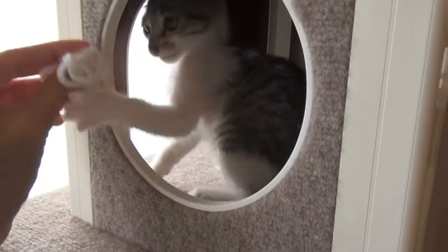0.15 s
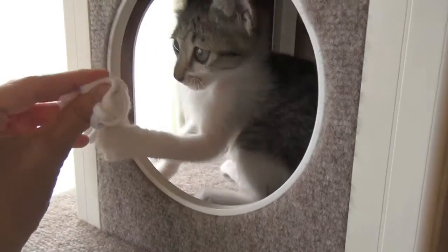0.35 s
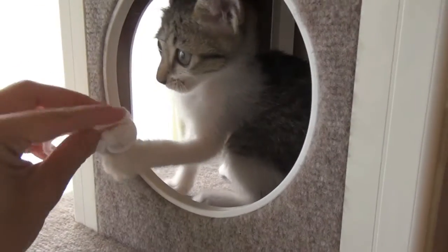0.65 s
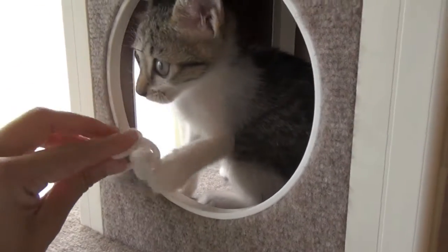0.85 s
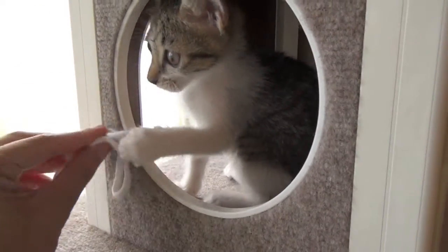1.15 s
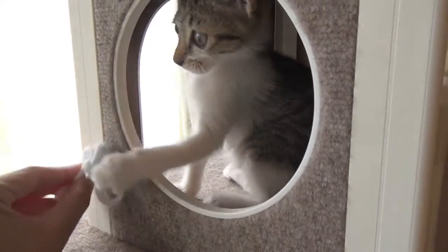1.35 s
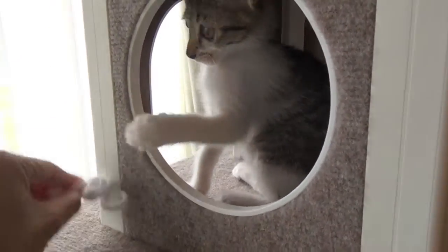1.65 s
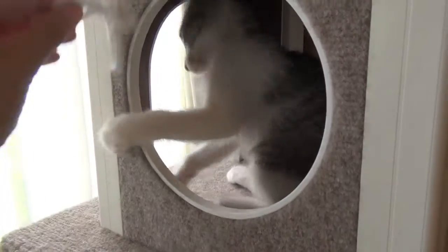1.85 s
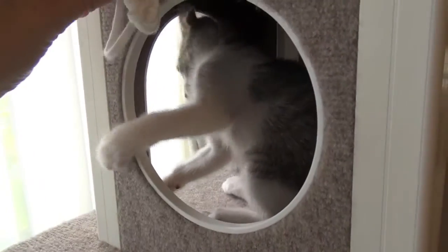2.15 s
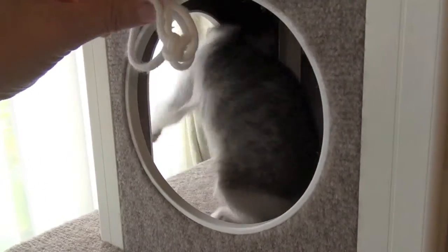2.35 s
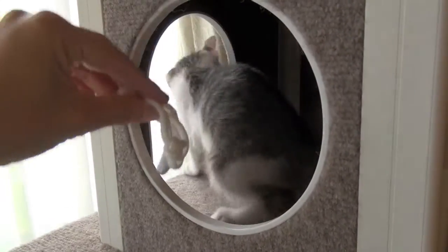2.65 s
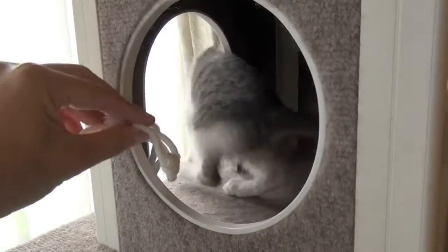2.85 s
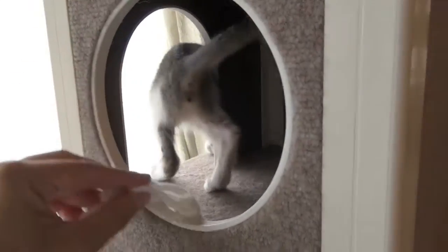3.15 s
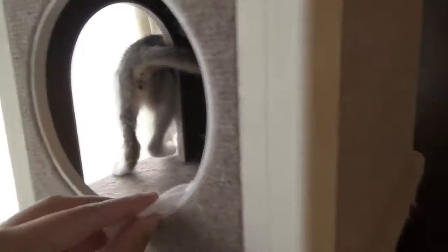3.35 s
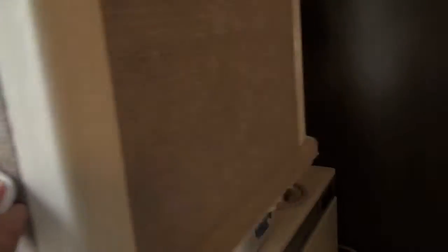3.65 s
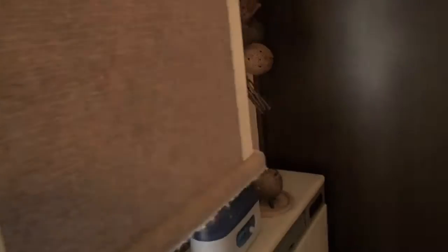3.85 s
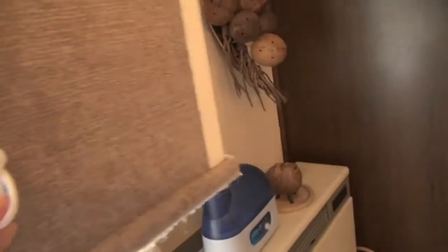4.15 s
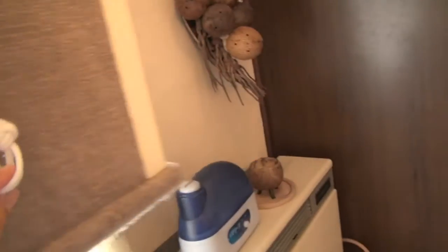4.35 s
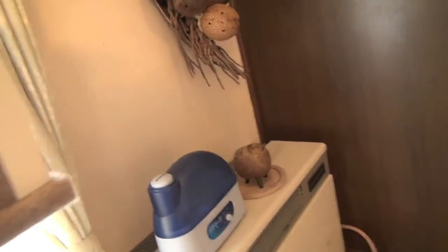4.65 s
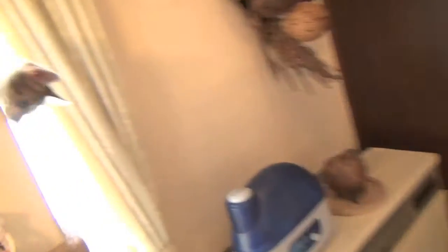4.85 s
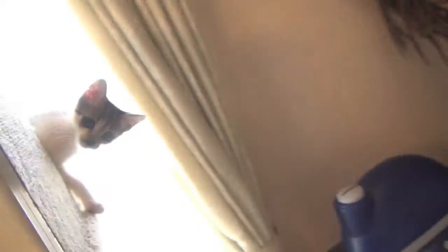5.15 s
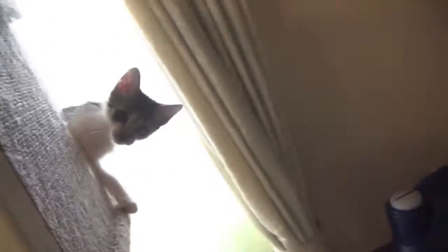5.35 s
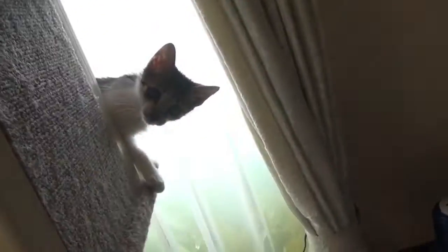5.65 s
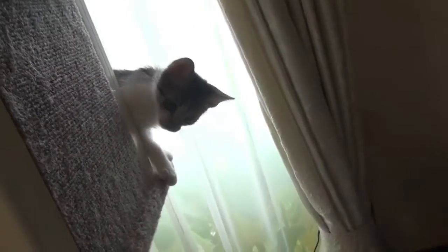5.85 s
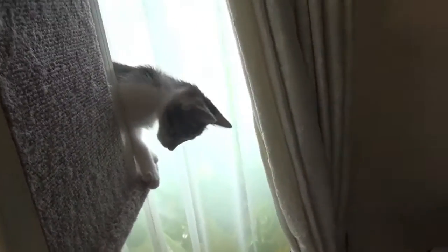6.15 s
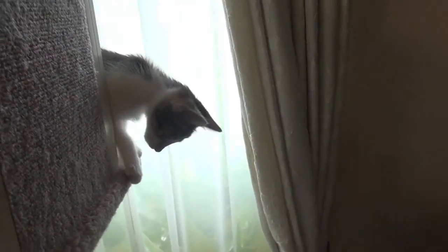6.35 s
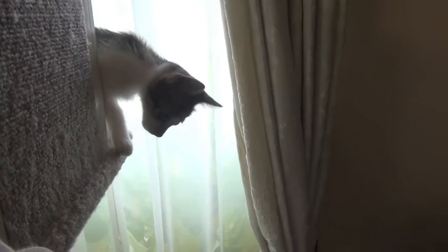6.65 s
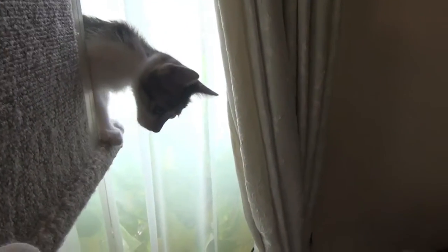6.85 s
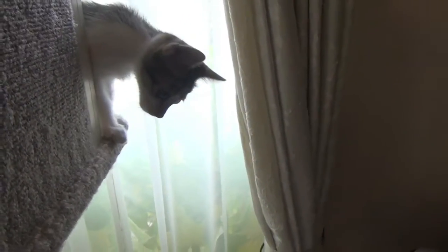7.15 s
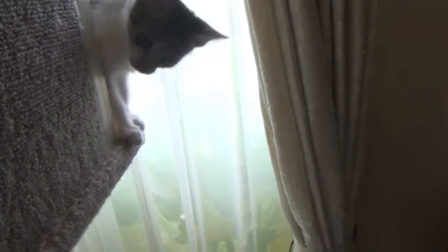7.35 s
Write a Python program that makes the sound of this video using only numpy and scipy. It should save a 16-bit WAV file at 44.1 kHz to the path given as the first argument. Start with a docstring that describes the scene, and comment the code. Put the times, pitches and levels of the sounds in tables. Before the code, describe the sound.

A quiet furnished room with faint hiss and low appliance hum, recorded close with a hand-held stereo microphone. At once a kitten's paw knocks on a carpeted wooden tower with a short, hollow thud. From 0.15 to 2.2 s it bats at a cord: soft, grainy rustles of fur and fibre with light, dull taps. Around 2.3 s claws pluck the carpet in quick ticks, then at 2.5 s comes the loudest event, a heavy boomy thump with a woody crack and small bounces. A crisp tap follows at 2.8 s, lighter ones at 3.0 s. Scratchy rubbing swells between 3.3 and 4.1 s, with ticks and muffled bumps near 4 s. After a lull, rustles and small knocks return from 4.6 to 5.8 s, softer and duller, then fade by 6.8 s. From about 6 s a faint distant vehicle hums, its pitch sinking near 6.8 s, leaving mostly quiet room tone.

```python
"""First a kitten's paw knocks and lands on a carpeted tower, close to a hand-held camera's microphone.
It bats at a cord and turns round in the cubby: struck boards ring as dying sines, the hollow cubby booms,
and fur, claws and cord rustle on the carpet as grainy bands of noise.
Behind lie the hiss and hum of a quiet room, soft low swells and, far outside, a vehicle slowing down."""
import sys
import numpy as np
from scipy import signal
from scipy.io import wavfile
from scipy.ndimage import uniform_filter1d

SR = 44100
rng = np.random.default_rng(int(sys.argv[2]) if len(sys.argv) > 2 else 0)


def output_pcm(signal):
    """Save a mono or channel-first signal as 16-bit PCM at the path in sys.argv[1].

    Samples are clipped to [-1, 1] before scaling.
    """
    pcm = np.clip(np.atleast_2d(signal).T, -1, 1) * 32767
    wavfile.write(sys.argv[1], SR, np.round(pcm).astype(np.int16))


N = 330750


def gain_of(db):
    """Decibels to an amplitude factor."""
    return 10 ** (np.asarray(db) / 20)


def evened(x):
    """Scales to rms 1."""
    return x / np.sqrt(np.mean(x ** 2) + 1e-20)


def peaked(x):
    """Scales to peak 1."""
    return x / abs(x).max()


def read(points, hz):
    """Reads a table on a log-frequency axis."""
    f, value = np.transpose(points)
    return np.interp(np.log(hz + 1), np.log(f + 1), value)


def add(mix, start_s, sound):
    """Mixes a sound in at its start time, cut at the end of the mix."""
    part = mix[:, round(start_s * SR):][:, :sound.shape[1]]
    part += sound[:, :part.shape[1]]


def panned(x, db):
    """One source heard a little louder on one side; positive leans left."""
    return np.array([x * gain_of(db / 2), x * gain_of(-db / 2)])


def narrow(hz, width_hz):
    """Noise squeezed by a one-pole resonance into a narrow band: a wavering tone."""
    pole = np.exp(-np.pi * width_hz / SR)
    noise = rng.standard_normal(N) + 1j * rng.standard_normal(N)
    slow = signal.lfilter([1], [1, -2 * pole, pole * pole], noise)
    return evened((slow * np.exp(2j * np.pi * hz * np.arange(N) / SR)).real)


# how alike left and right hear the direct noise: (frequency [Hz], likeness [0-1])
LEFT_RIGHT_LIKENESS = [(30, 1), (250, 0.99), (450, 0.91), (800, 0.72), (2400, 0.59), (5000, 0.79),
                       (8000, 0.78), (11000, 0.75)]


def pair(shape, patchy_db, size):
    """Two partly alike channels of noise with a given spectrum and drifting patches."""
    frames, hz = 4 * N // size + 5, np.fft.rfftfreq(size, 1 / SR)
    a, b, c, d, patches = rng.standard_normal((frames, len(hz), 5)).T
    patches = uniform_filter1d(patches, size=size // 64, axis=0)  # smooth over frequency
    patches = evened(uniform_filter1d(patches, size=10, axis=1))  # then over time
    same = read(LEFT_RIGHT_LIKENESS, hz)[:, None]
    left = a + 1j * b
    right = same * left + np.sqrt(1 - same ** 2) * (c + 1j * d)
    spectra = np.array([left, right]) * gain_of(read(shape, hz)[:, None] + patchy_db * patches)
    return evened(signal.istft(spectra, nperseg=size, noverlap=3 * size // 4)[1][:, :N])


# spectrum of room and microphone hiss: (frequency [Hz], relative level [dB])
AIR_SPECTRUM = [(12, -57), (20, -1.5), (48, -15.5), (187, -11.5), (222, -5), (310, -17), (357, -5.5),
                (399, -13), (499, -18), (1060, -20), (1290, -35), (1400, -20.5), (2600, -28), (4060, -27.5),
                (16000, -35.5)]


def air():
    """Room air and microphone hiss: nearly even noise with a low-heavy spectrum."""
    return gain_of(-58) * pair(AIR_SPECTRUM, patchy_db=0.3, size=2048)


# appliances: (frequency [Hz], level before the move [dB], waver width [Hz], steady share [0-1],
# level change behind the tower [dB])
APPLIANCE_TONES = [(28.6, -83, 3, .6, 2), (59, -78, 2.7, 0.5, 12), (116.5, -71, 4.1, 0.3, -1.5),
                   (228.4, -68, 3.7, 0.52, 0), (1108, -75, 105, 0.03, 5)]


def hum():
    """Motors elsewhere in the house: faint tones, partly wavering; levels shift as the camera moves."""
    t, out = np.arange(N) / SR, np.zeros(N)
    behind = np.clip(t - 4.0, 0, 1)  # the move takes 4 s to 5 s
    for hz, db, waver_hz, steady_share, change_db in APPLIANCE_TONES:
        steady = np.sqrt(2 * steady_share) * np.sin(2 * np.pi * (hz * t + rng.random()))
        wavering = np.sqrt(1 - steady_share) * narrow(hz, waver_hz)
        out += gain_of(db + change_db * behind) * (steady + wavering)
    return out


# far vehicle: (time [s], firing rate [Hz], level before the orders [dB])
VEHICLE_SPEED = [(5.7, 74, -73), (6.101, 74.64, -60), (6.55, 75.73, -59.5), (6.68, 73.14, -57.5),
                 (6.8, 64.6, -61.5), (7.0, 54.8, -53.5), (7.15, 53.8, -56), (7.5, 53.6, -56.5)]
# its harmonics: (multiple of the firing rate, relative level [dB])
FIRING_ORDERS = [(1, -5), (2, -8), (3, -11), (4, -15.5)]


def engine():
    """Low firing orders far outside glide with the engine speed; each flutters in level."""
    s, hz, db = np.transpose(VEHICLE_SPEED)
    t = np.arange(N) / SR
    firings = np.cumsum(np.interp(t, s, hz)) / SR
    orders = np.zeros(N)
    for multiple, order_db in FIRING_ORDERS:
        flutter = gain_of(order_db + 4.0 + 2.0 * narrow(0, 4.0))
        orders += flutter * np.cos(2 * np.pi * multiple * firings)
    return gain_of(np.interp(t, s, db, left=-100)) * orders


# low notes, most after a step: (start [s], length [s], frequency [Hz], level [dB])
LOW_SWELLS = [(2.585, 0.099, 160, -45), (2.793, 0.17, 103, -59), (3.0, 0.92, 57, -64.5),
              (4.05, 0.5, 59.6, -66), (4.3, 1, 185.5, -63), (4.895, 0.38, 55.3, -62.5),
              (5.468, 0.139, 142, -52.5), (5.497, 0.56, 361.3, -66.5), (7.102, 0.45, 227, -64.5),
              (7.218, 0.93, 359, -62)]


def swells():
    """Soft low notes that rise, waver and fade: a sine mixed with narrow noise."""
    t, out = np.arange(N) / SR, np.zeros(N)
    for start, length, hz, db in LOW_SWELLS:
        shape = np.sin(np.pi * np.clip((t - start) / length, 0, 1)) ** 0.29
        steady = np.sqrt(2) * np.sin(2 * np.pi * hz * t + 2 * np.pi * rng.random())
        out += gain_of(db) * shape * (0.96 * steady + 0.67 * narrow(hz, 12.0))
    return out


# how long the room rings: (frequency [Hz], t60 [s])
ROOM_DECAY = [(100, 0.39), (300, 0.21), (1000, 0.23), (4000, 0.17), (12000, 0.06)]
# echoes come from all round: (frequency [Hz], left-right likeness [0-1])
ECHO_LIKENESS = [(60, 1), (200, 1), (400, 0.77), (800, 0.66), (3000, 0.55), (10000, 0.79)]


def room(x):
    """The room's echo: sparse taps of random sign, each band dying at its own speed."""
    taps = np.zeros((2, SR // 2))
    slots = np.arange(200, SR // 2 - 20, 20)  # one tap in every 20 samples
    at = slots + rng.integers(0, 20, (2, len(slots)))
    np.put_along_axis(taps, at, rng.choice([-1., 1.], at.shape), 1)
    hz, t, z = signal.stft(taps, SR, nperseg=512)
    same = read(ECHO_LIKENESS, hz)[:, None]
    z[1] = same * z[0] + np.sqrt(1 - same ** 2) * z[1]
    decay = gain_of(-60 * t / read(ROOM_DECAY, hz)[:, None])
    tail = signal.istft(z * decay, SR, nperseg=512)[1]
    return signal.fftconvolve(x[None], tail / np.linalg.norm(tail[0]), axes=1)[:, :N]


# strokes on the carpet, before grain: (start [s], length [s], scuff level [dB],
# fibre hiss over the scuff [dB], weight over the scuff, before the boards [dB])
CARPET_STROKES = [(0.154, .28, -53, -1.5, -1.5), (0.258, 0.11, -58.5, -3, 6.5),
                  (0.534, 0.39, -59.5, 1, -3.5), (0.829, 0.27, -55, -0.5, -7.5),
                  (1.067, 0.22, -57.5, -1.5, -3), (1.235, 0.47, -56, 1, -9), (1.614, .16, -53.5, -3.5, -10),
                  (1.786, 0.092, -63, -1, 3), (1.89, 0.19, -62, -2, 1), (2.062, 0.16, -61, -6, 7.5),
                  (2.195, 0.28, -56, -2.5, 2), (2.486, 0.14, -53, -3.5, 12.5), (2.606, 0.089, -55, -11, 8),
                  (2.79, 0.1, -58.5, -2.5, -4), (2.852, 0.16, -58.5, -2, -3), (2.972, 0.25, -57, -4.5, -2),
                  (3.235, 0.21, -59, 2.5, 2), (3.358, 0.26, -50.5, -0.5, -3), (3.52, 0.24, -51, -1, 1),
                  (3.706, 0.31, -49.5, 1, 4), (3.884, 0.25, -46.5, -7, 3.5), (4.095, 0.29, -64.5, -7, 4),
                  (4.286, 0.29, -60, -12, 13.5), (4.6, 0.17, -57.5, -9, 4), (4.741, 0.38, -52.5, -5, 3.5),
                  (4.967, 0.28, -52, -1, -3), (5.204, 0.18, -54, -8, 1), (5.37, 0.19, -50.5, -7.5, -2),
                  (5.494, 0.35, -59.5, -1.5, 4.5), (5.736, 0.26, -57.5, -8.5, -1),
                  (5.917, 0.24, -59, -3.5, 4.5), (6.201, 0.16, -54.5, -9, -5), (6.323, 0.13, -56, -16, -1),
                  (6.51, 0.17, -58, -7, -2), (6.63, .24, -63.5, -5.5, 0), (6.793, 0.14, -67, -18, 1),
                  (7.099, .2, -74, -13, 16)]
# fur brushing between strokes: (hiss [dB], scuff [dB], fine top [dB], boom before the boards [dB])
RESTING_LEVELS = (-73, -64.5, -69.5, -67.5)
# the top octave against the hiss of the strokes: (time [s], level [dB])
FINE_TOP_LEVEL = [(0, -3), (1.2, -1.5), (2.2, 3), (2.7, 5), (2.8, -18), (3.15, -8), (3.3, 4.5), (3.65, -2),
                  (3.85, -11), (4.9, -14), (7.5, -16)]
STROKE_PEAK, STROKE_POINT = 0.49, 1.23  # where a stroke peaks (share of its length), how pointed it is
BOOM_LAG_S = 0.024  # the weight follows the touch of the fur


def strokes(t):
    """Every stroke swells and fades alike; gives the strength of hiss, scuff, fine top and boom."""
    start, length, scuff_db, hiss_db, boom_db = np.transpose(CARPET_STROKES)[:, :, None]
    progress = np.clip((t - start) / length, 0, 1) ** (np.log(.5) / np.log(STROKE_PEAK))
    power = abs(np.sin(np.pi * progress)) ** (2 * STROKE_POINT) * gain_of(2 * scuff_db)
    hiss = (power * gain_of(2 * hiss_db)).sum(0)
    boom = np.interp(t - BOOM_LAG_S, t, (power * gain_of(2 * boom_db)).sum(0))
    top = hiss * gain_of(2 * np.interp(t, *np.transpose(FINE_TOP_LEVEL)))
    resting_power = gain_of(RESTING_LEVELS)[:, None] ** 2
    return np.sqrt(np.array([hiss, power.sum(0), top, boom]) + resting_power)


# spectra of fibre hiss, scuff, fine top and boom: (frequency [Hz], relative level [dB])
FIBRE_SPECTRUM = [(2500, -38), (3600, -3.5), (4600, 1), (5700, 3.5), (6700, 1), (8000, -6.5), (9500, -39),
                  (12000, -35)]
SCUFF_SPECTRUM = [(400, -23.5), (650, -3), (850, -7), (1120, -3), (1500, -5.5), (2300, -8.5), (3200, -10.5),
                  (4500, -23)]
TOP_SPECTRUM = [(7000, -16), (8800, -8), (10200, -5), (12000, -1.5), (13700, -5.5), (15000, -38),
                (16000, -1)]
BOOM_SPECTRUM = [(90, -79), (150, 4), (220, -9), (300, -10), (400, 1), (520, 2.5), (750, -42)]
# the cubby's note against the boom, less behind the tower: (time [s], level [dB])
CUBBY_LEAD = [(0, 9.5), (3.6, 1.5), (4.1, -4.5), (7.5, -6.5)]
CUBBY_HZ, CUBBY_WIDTH_HZ = 285, 24
BOOM_COUPLING_DB = -7.5  # how much of the weight of a stroke reaches the boards


def rubbing():
    """Fibres slip in clumps: one grainy gate shakes hiss, top and scuff; the cubby's air answers."""
    t, coarse = np.arange(N) / SR, np.arange(0, N + 200, 200) / SR
    hiss, scuff, top, low = (np.interp(t, coarse, strength) for strength in strokes(coarse))
    slips = rng.random(N) < 220 / SR  # about 220 slips a second
    slips = slips * gain_of(6.4 * np.minimum(rng.exponential(1, N), 3))
    slip_decay = np.exp(-np.arange(2000) / SR / 0.0082)
    grain = evened(0.38 + evened(signal.oaconvolve(slips, slip_decay)[:N]))
    cubby_note = gain_of(np.interp(t, *np.transpose(CUBBY_LEAD))) * narrow(CUBBY_HZ, CUBBY_WIDTH_HZ)
    boom = pair(BOOM_SPECTRUM, patchy_db=3.5, size=1024) + cubby_note
    fibres = hiss * pair(FIBRE_SPECTRUM, patchy_db=2.0, size=256) * grain ** 0.38
    fibres += top * pair(TOP_SPECTRUM, patchy_db=2.5, size=256) * grain ** 0.19
    fibres += scuff * pair(SCUFF_SPECTRUM, patchy_db=2.0, size=512) * grain ** 0.45
    return fibres * panned(np.ones(1), 1) + low * gain_of(BOOM_COUPLING_DB) * boom


# claws plucking loops of carpet: (time [s], peak level [dB], frequency [Hz], t60 [s])
CARPET_PLUCKS = [(2.2858, -39, 1470, .02), (2.318, -39, 1430, .022), (2.333, -36, 1370, 0.015),
                 (2.338, -36, 1300, 0.012), (2.3487, -35.5, 1420, 0.016), (2.476, -29, 1150, 0.011),
                 (3.432, -38, 1270, 0.015), (3.582, -43.5, 2250, .015), (5.279, -38, 1110, 0.022)]


def plucks(mix):
    """A loop of yarn snaps back from a claw: one short, dying note each."""
    t = np.arange(2000) / SR
    for s, db, hz, t60 in CARPET_PLUCKS:
        envelope = (1 - np.exp(-t / 0.00077)) * gain_of(-60 * t / t60)
        note = peaked(np.sin(2 * np.pi * hz * t) * envelope)
        add(mix, s, gain_of(db) * note * np.ones((2, 1)))


def ring(modes, t, lean_db):
    """Dying sines of a struck body; lean_db favours the modes that the blow reaches best."""
    hz, db, t60 = np.transpose(modes)[:, :, None]
    return (gain_of(db + lean_db - 60 * t / t60) * np.sin(2 * np.pi * hz * t)).sum(0)


# deep modes of the boards: (frequency [Hz], relative level [dB], t60 [s])
BOARD_MODES = [(100.4, -20, 0.3), (153, 3.5, 0.087), (202.3, -6, 0.24), (216.3, -4, 0.21), (279, -7, 0.19),
               (369, -14, 0.19)]


def blow(t, board_db, note_db, note_hz, note_t60):
    """The soft weight of a paw drives the boards and one hollow note."""
    swell = 1 - np.exp(-t / 0.0047)  # the pad of the paw flattens first
    note = peaked(swell * gain_of(-60 * t / note_t60) * np.sin(2 * np.pi * note_hz * t))
    sides_db = 0.46 * rng.uniform(-1.1, 1, (len(BOARD_MODES), 1))  # each mode beams its own way
    both_sides = np.array([ring(BOARD_MODES, t, sides_db), ring(BOARD_MODES, t, -sides_db)])
    return gain_of(board_db) * peaked(swell * both_sides) + gain_of(note_db) * panned(note, 0.77)


# heavy landings and the bounces of the tower on the floor: (time [s], board level [dB],
# thud level [dB], thud pitch [Hz], thud t60 [s])
LANDINGS = [(0.0417, -25.5, -23.5, 226, 0.092), (2.476, -45, -41, 390, .047),
            (2.482, -36, -31.5, 393, 0.056), (2.501, -14.5, -4.5, 215, 0.052),
            (2.509, -45, -4.5, 234, 0.031), (2.532, -48, -38, 243, 0.076), (2.554, -49, -30, 220, .052),
            (2.578, -35, -27.5, 237, 0.035), (2.597, -39, -42, 231, 0.066), (2.646, -37.5, -42, 251, 0.12),
            (3.951, -39.5, -41, 336, 0.097), (4.013, -36, -37, 433, 0.086), (5.279, -45.5, -55, 268, .08),
            (5.4286, -40.5, -31.5, 316, 0.058), (5.784, -43, -42, 364, .06), (5.808, -49, -54, 390, .05)]


def thuds(mix):
    """Landing weight and the tower's bounces: deep board modes under one dying thud note."""
    for s, *row in LANDINGS:
        add(mix, s, blow(np.arange(SR // 4) / SR, *row))


# bright modes of the frame: (frequency [Hz], relative level [dB], t60 [s])
FRAME_MODES = [(456, 9, .05), (576, 8.5, 0.038), (692, 3, 0.034), (823, -8, 0.042), (969, -4.5, 0.056),
               (1068, 4, 0.026), (1209, 1.5, 0.018), (1396, -5.5, 0.039), (1584, -0.5, 0.026),
               (1890, 1, 0.014), (2170, -3, .018), (2400, -1, 0.028), (3040, -25, 0.0116),
               (3560, -20, 0.013), (4300, -4, 0.012)]
# the cubby's note shifts as the kitten does: (time [s], frequency [Hz], t60 [s])
HOLLOW_NOTE = [(0, 290, 0.31), (2.4, 285.7, 0.14), (3.5, 268, 0.093), (4.6, 296, .07)]
BOARD_UNDER_DB = -12  # boards under the hollow note
CLAW = signal.butter(3, [2300, 6800], "band", fs=SR, output="sos")  # the bright band of a claw tip
CLAW_EDGE = signal.butter(3, 8000, "high", fs=SR, output="sos")  # the finest edge of the tick


def knock(s, crack_db, colour_hz, scuff_ms, tick_db, weight_db):
    """A sharp touch and a short scuff shake the frame; the weight behind it sounds the cubby."""
    t = np.arange(SR // 4) / SR
    u = t * 1000 / scuff_ms
    shared, own = rng.standard_normal(len(t)), rng.standard_normal((2, len(t)))
    scuff = (shared + 0.11 * own) * np.exp(-u) * (1 - np.exp(-u / 0.34))  # long scuffs start gently
    scuff[:, 0] = 2.2 / max(scuff_ms, 1)  # short ones start with a sharp contact
    octaves_off = np.log2(np.array(FRAME_MODES)[:, :1] / colour_hz)
    frame = ring(FRAME_MODES, t, -11.0 * octaves_off ** 2)
    crack = peaked(signal.fftconvolve(scuff, frame[None], axes=1)[:, :len(t)])
    tick = peaked(signal.sosfilt(CLAW, scuff))
    tick += gain_of(-19.5) * peaked(signal.sosfilt(CLAW_EDGE, scuff))
    when, hz, t60 = np.transpose(HOLLOW_NOTE)
    note_hz, note_t60 = np.interp(s, when, hz), np.interp(s, when, t60)
    body = blow(t, weight_db + BOARD_UNDER_DB, weight_db, note_hz, note_t60)
    touch = gain_of(crack_db) * crack + gain_of(tick_db) * tick
    return body + touch * panned(np.ones(1), 0.6)  # paws lean left


# sharp contacts of paw and claw: (time [s], crack level [dB], crack colour [Hz], scuff length [ms],
# claw tick level [dB], weight level [dB])
PAW_KNOCKS = [(.036, -23.5, 980, 1.77, -29, -33), (.0415, -26, 840, 3.6, -64, -50),
              (.168, -35.5, 1083, 2.5, -43, -53), (.246, -44, 1140, 7.5, -50, -66),
              (.490, -49, 1190, 3.7, -51, -57), (.984, -49, 600, 7.3, -52, -49),
              (1.1432, -41.5, 1140, 3.1, -49, -49.5), (1.344, -43.5, 1110, 20, -44.5, -67),
              (1.521, -45, 1310, 2.6, -44, -68), (1.7, -43, 1210, 15, -45, -47),
              (1.817, -62, 1490, 2.3, -45, -61), (1.828, -58, 600, 3.3, -51, -42.5),
              (1.989, -42, 680, 2.5, -57, -50.5), (2.259, -43.5, 1800, 13, -43, -57),
              (2.282, -32.5, 2000, 3.7, -33.5, -60), (2.287, -29, 1300, 1.9, -61, -34),
              (2.319, -39, 1460, 2.4, -41, -40.5), (2.331, -41, 1450, 2, -38, -58),
              (2.341, -37, 1310, 1.3, -47, -49), (2.349, -41, 1390, 1, -41, -50),
              (2.421, -46, 1500, 1, -43, -62), (2.476, -19, 1030, 3.5, -63, -50),
              (2.482, -22, 600, 1.3, -57, -50), (2.501, -16, 695, 3.4, -30.5, -40),
              (2.507, -18.5, 517, 6.3, -53.5, -35), (2.532, -38, 895, 16, -45, -50),
              (2.578, -39, 600, 8.2, -54, -50), (2.646, -44, 1200, 12, -44, -50),
              (2.8045, -23, 1110, 1.01, -22.5, -35.5), (2.883, -40.5, 1510, 4.4, -63, -65),
              (3.0325, -36, 2170, 1.6, -35.5, -47), (3.061, -41.5, 910, 6.1, -70, -52),
              (3.323, -47.5, 2600, 33, -47, -62), (3.354, -37.5, 1500, 5.2, -41.5, -42),
              (3.376, -47, 2640, 29, -46, -57), (3.415, -38, 1800, 1.2, -36, -59),
              (3.432, -39, 1300, 1.5, -48, -45), (3.494, -39, 1200, 6.8, -44, -42.5),
              (3.581, -40.5, 1600, 4.2, -45, -62), (3.762, -58, 2500, .83, -42, -54),
              (3.787, -37.5, 1200, 1.9, -38, -45.5), (3.862, -37, 1510, 2.7, -35, -48),
              (3.95, -36.5, 960, 13, -37.5, -54), (4.013, -34.5, 805, 15, -37, -54),
              (4.652, -40.5, 1690, 1.9, -51, -59), (4.896, -41.5, 900, 11, -41, -62),
              (5.240, -42, 990, 10, -60, -56), (5.264, -37, 1110, 12, -44, -66),
              (5.279, -40, 1100, 18, -57, -59), (5.415, -42, 1530, 21, -39, -52),
              (5.577, -42.5, 990, 13, -51, -54.5), (5.784, -33.5, 1160, 16, -70, -55),
              (5.786, -44, 2900, 3.8, -61, -62), (5.807, -39, 1100, 28, -66, -58),
              (6.189, -44, 990, 1.7, -61, -55), (6.24, -53, 3920, 15, -49, -66),
              (6.268, -45, 2600, 27, -46, -65), (6.36, -45.5, 2600, 19, -50.5, -64),
              (6.591, -43.5, 687, 2.5, -60, -66)]


def knocks(mix):
    """Paws and claws strike the tower: each contact cracks, ticks and sounds the hollow cubby."""
    for row in PAW_KNOCKS:
        add(mix, row[0], knock(*row))


def scene():
    """The quiet house, rubbing, then plucks, thuds and knocks with their echo."""
    paws = np.zeros((2, N))
    plucks(paws)
    thuds(paws)
    knocks(paws)
    house = air() + hum() + engine() + swells()
    echo = gain_of(-16.5) * room(paws.mean(0))
    return house + rubbing() + paws + echo


def record(dry):
    """Close microphone ports hear the top nearly alike; a bass roll-off, then the band limit."""
    mid, side = dry.mean(0), (dry[0] - dry[1]) / 2
    below_top = signal.oaconvolve(side, signal.firwin(255, 11300, fs=SR), "same")
    side = 0.065 * side + 0.63 * below_top
    both = np.array([mid + side, mid - side])
    both = signal.sosfilt(signal.butter(2, 45, "high", fs=SR, output="sos"), both)
    band_limit = signal.firwin(1023, 15750, window=("kaiser", 9), fs=SR)
    return signal.oaconvolve(both, band_limit[None], "same")


dry = scene()
out = record(dry)
output_pcm(out)
```